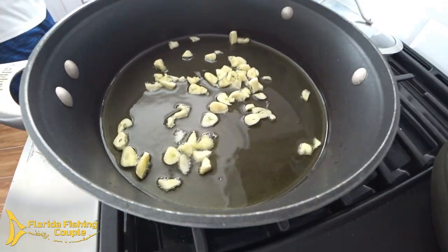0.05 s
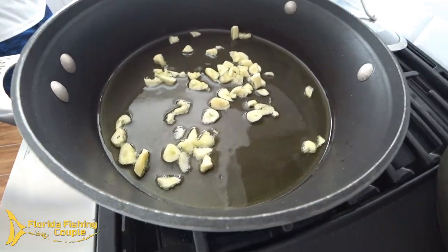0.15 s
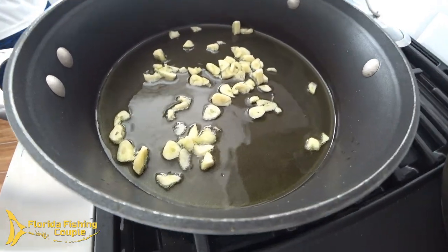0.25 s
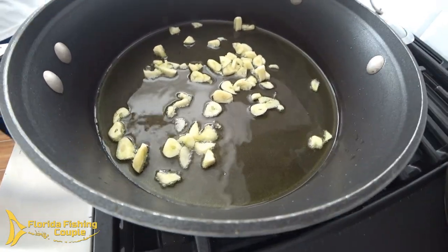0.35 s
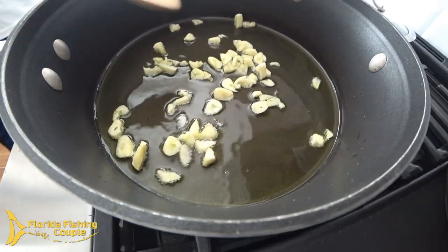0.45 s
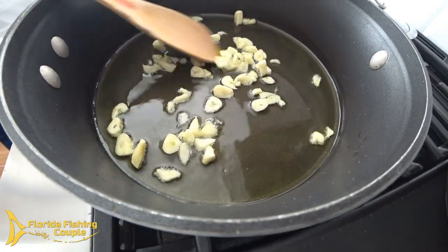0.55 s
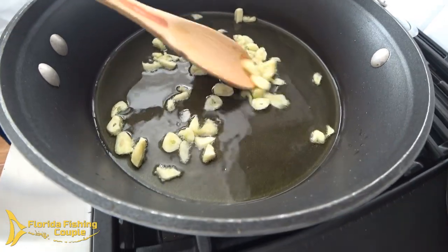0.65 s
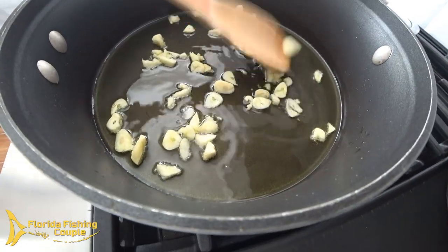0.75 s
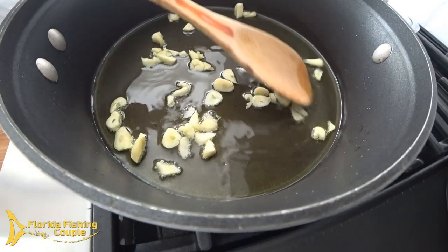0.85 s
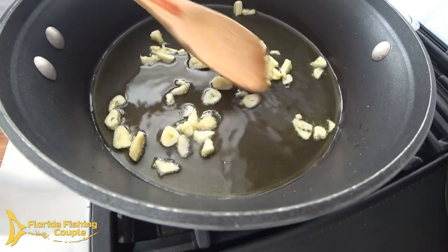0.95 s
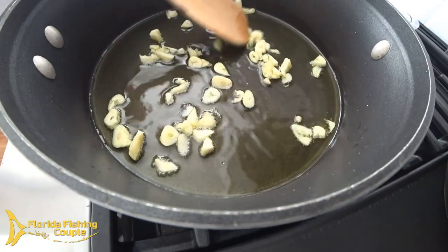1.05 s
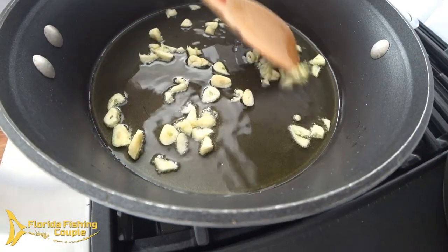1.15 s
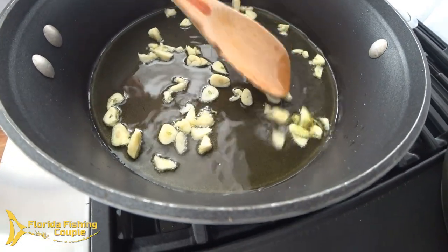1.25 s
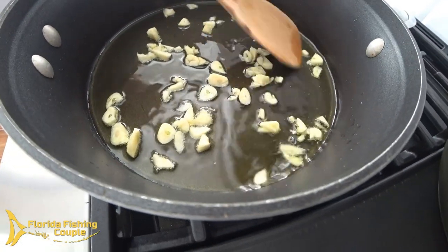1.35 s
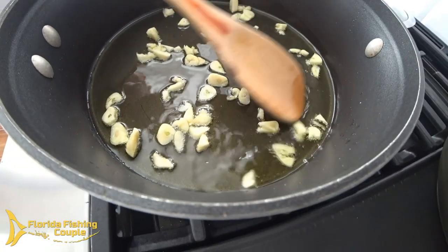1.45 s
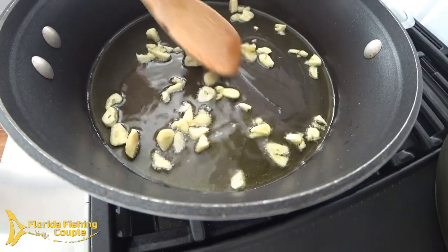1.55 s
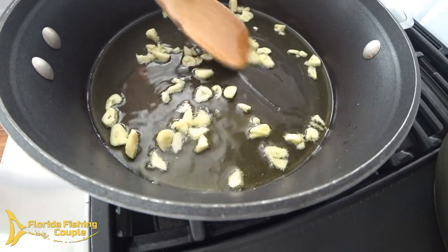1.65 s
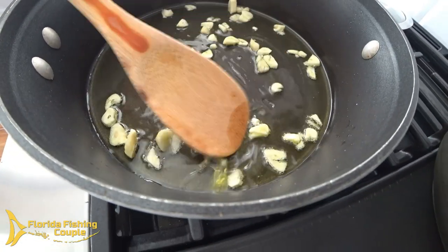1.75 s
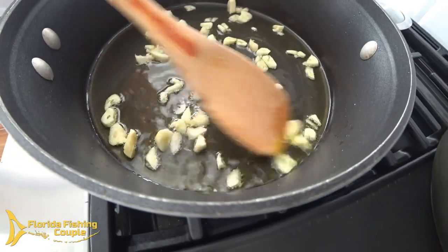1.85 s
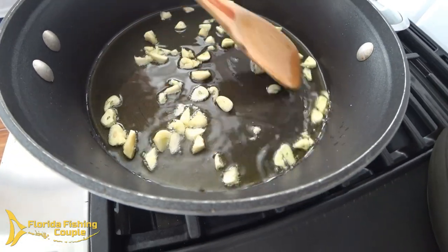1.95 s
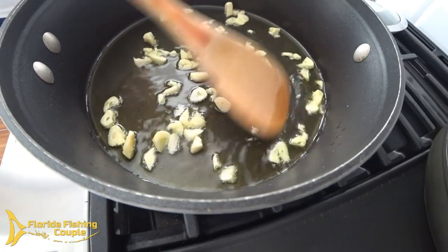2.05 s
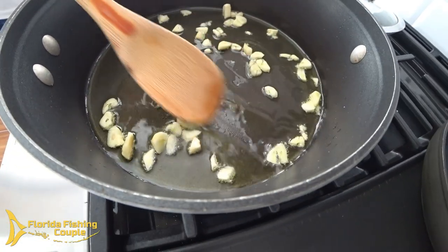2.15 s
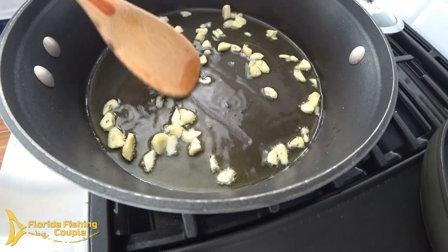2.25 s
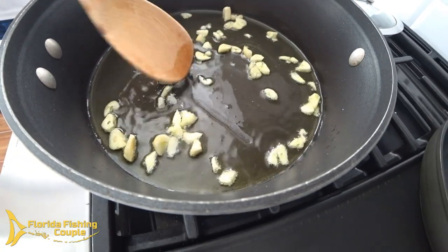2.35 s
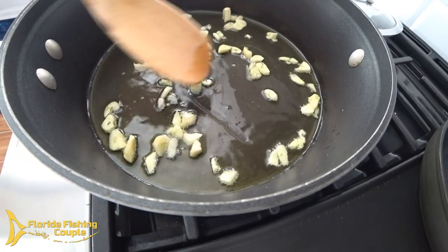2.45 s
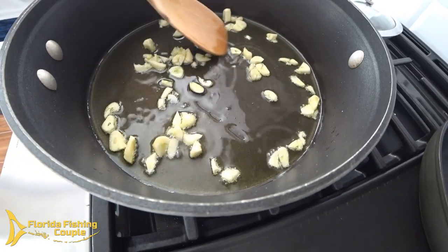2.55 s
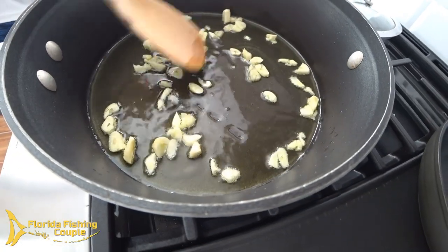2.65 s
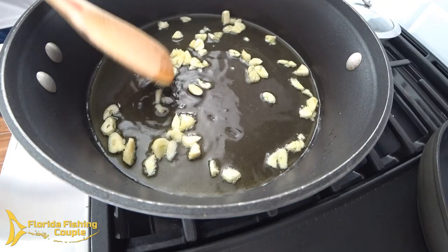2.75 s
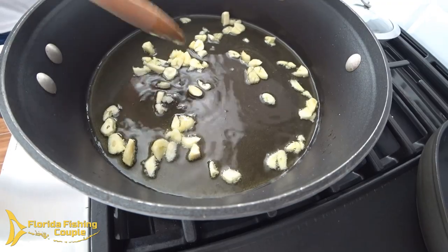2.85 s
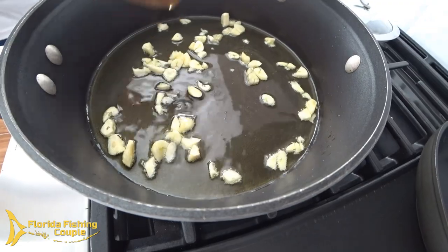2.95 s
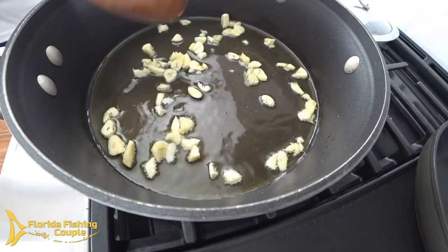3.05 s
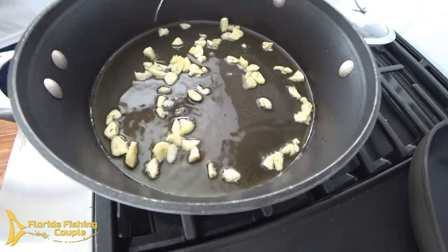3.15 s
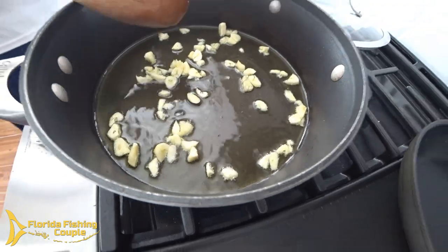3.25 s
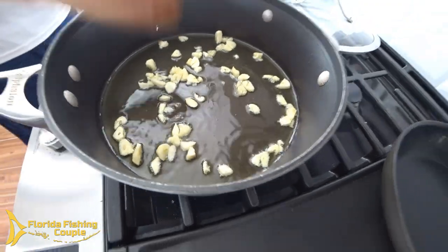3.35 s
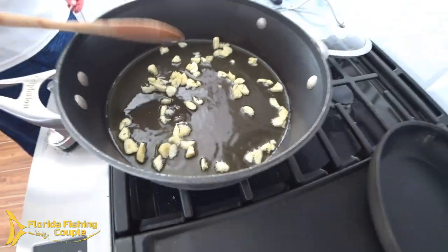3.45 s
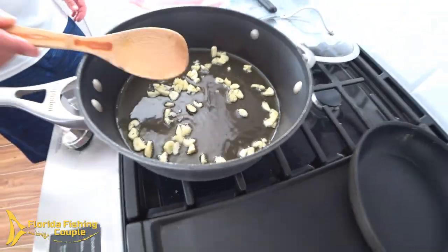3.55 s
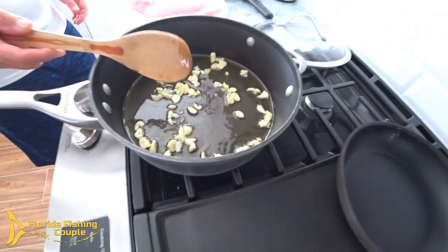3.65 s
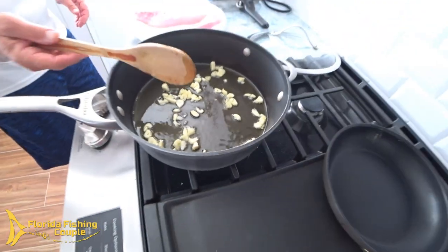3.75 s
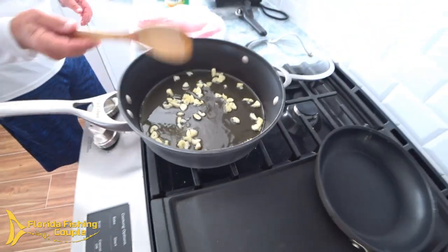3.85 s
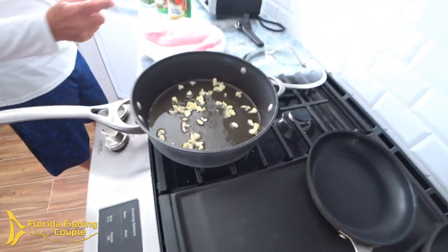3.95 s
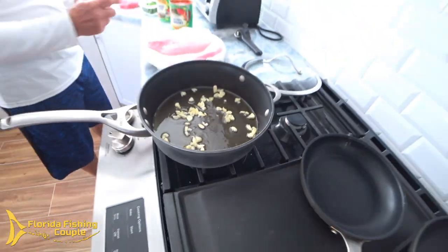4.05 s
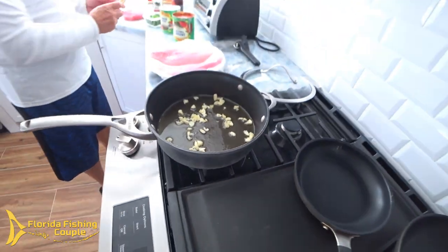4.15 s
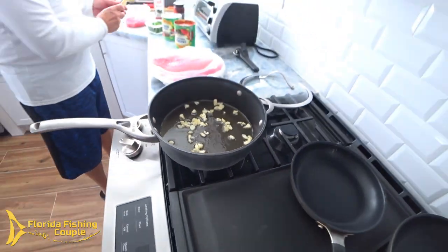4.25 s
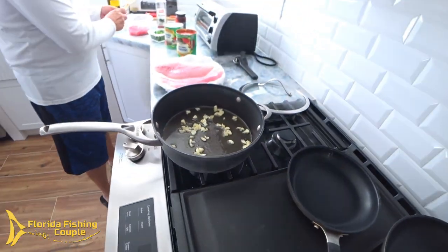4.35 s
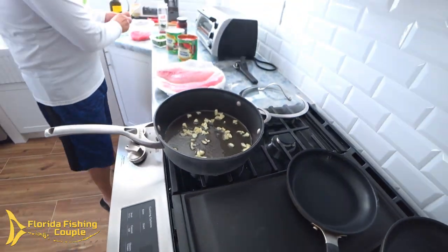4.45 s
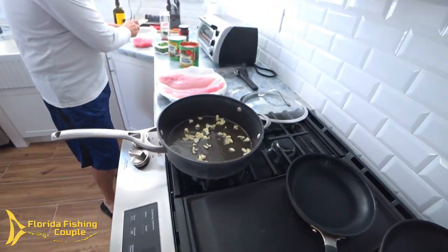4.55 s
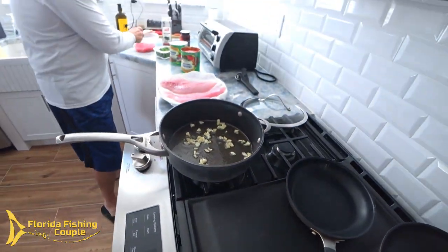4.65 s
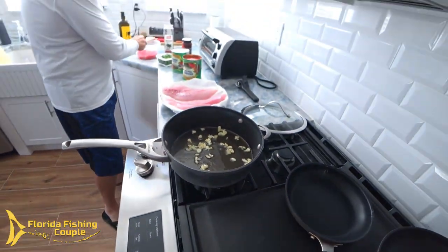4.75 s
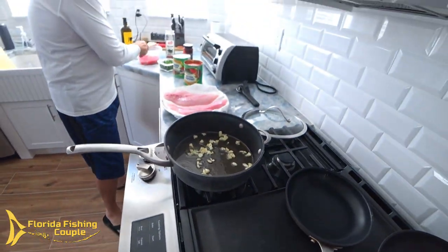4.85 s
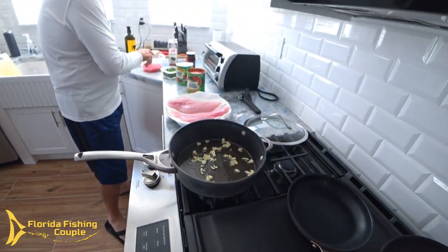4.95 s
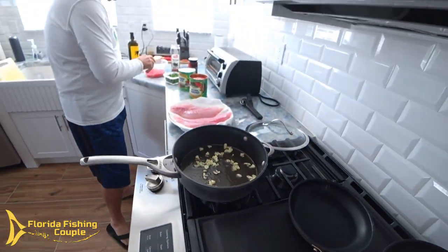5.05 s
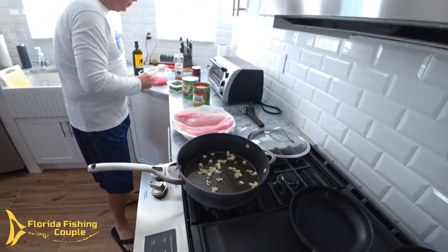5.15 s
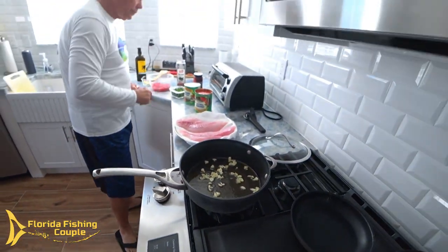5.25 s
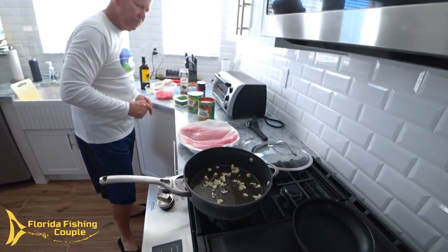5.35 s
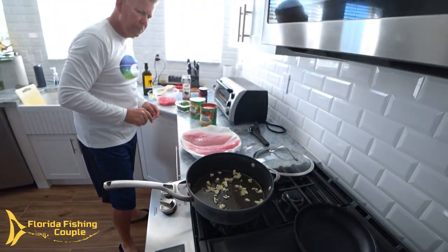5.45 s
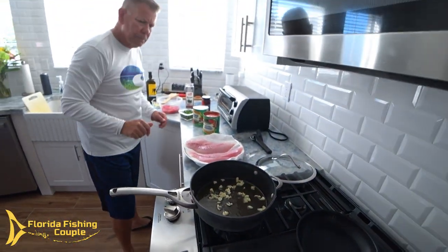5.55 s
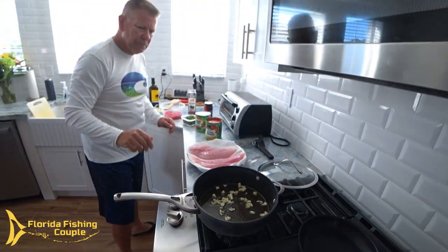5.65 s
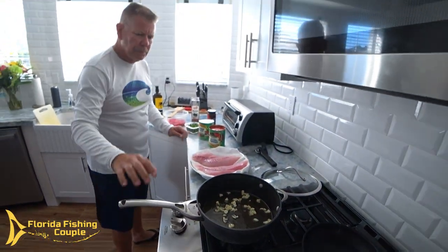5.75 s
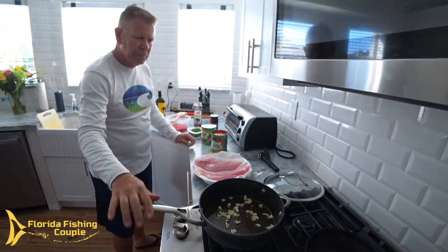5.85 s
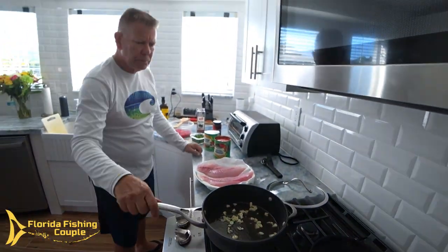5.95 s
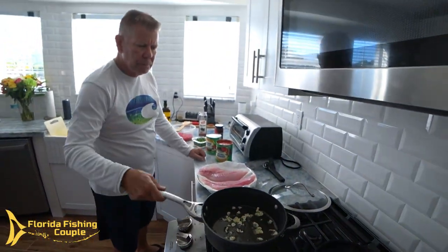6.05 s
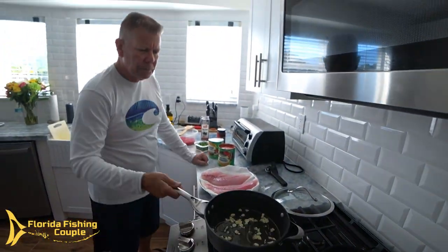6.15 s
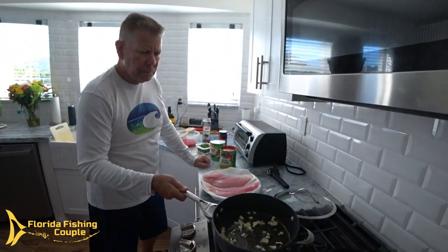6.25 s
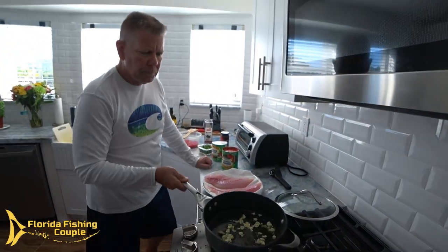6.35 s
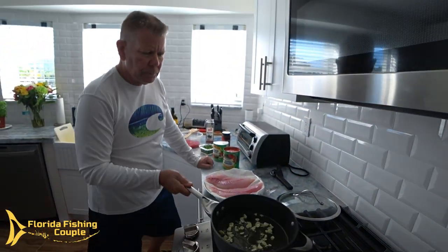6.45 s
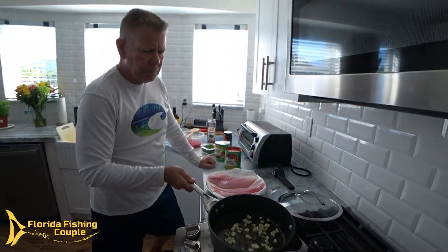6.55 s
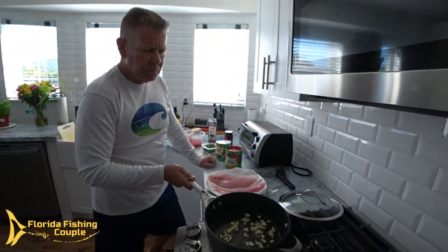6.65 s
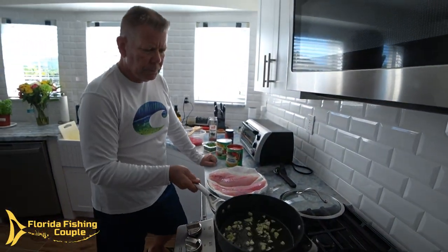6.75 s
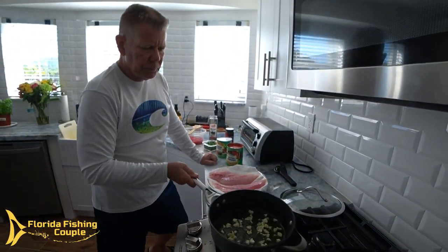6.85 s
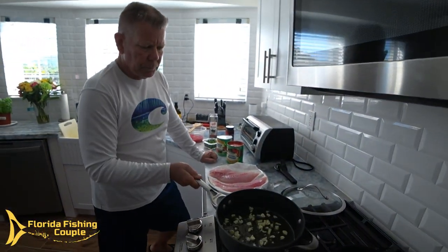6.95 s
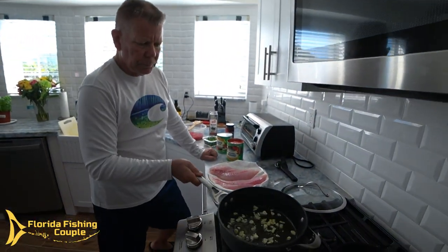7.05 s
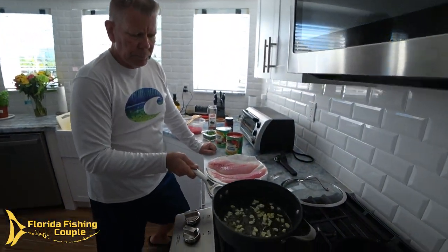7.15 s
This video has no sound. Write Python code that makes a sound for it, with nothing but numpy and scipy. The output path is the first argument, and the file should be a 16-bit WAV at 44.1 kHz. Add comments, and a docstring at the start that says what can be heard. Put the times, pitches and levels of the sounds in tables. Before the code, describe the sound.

A light, grainy frying hiss dotted with crisp, high spits, over faint kitchen air. Wooden spoon knocks and brief gritty strokes excite a deep metal pot; three strong rim raps follow, then one more tap. Frying thins with distance, a dull woody clack marks the spoon being set down, and the pot is jolted and shaken on the stove grate in hollow, rasping bursts. Wide handheld stereo microphones, short bright room reflections.

```python
"""Garlic fizzes and spits in oil in a deep metal pot, as short blurred rings over grainy coloured noise.
Oil splashes once; a wooden spoon taps and scrapes the bottom, raps the rim and is laid on the counter;
then the pot is knocked and shaken to and fro on the iron grate. Noise blows and strokes drive resonances
of the pot, with a dry treble from the contact. A small hard kitchen answers, and two microphone ports of
a hand-held camera hear it all, nearly in opposite phase in the middle of the spectrum."""
import sys
import numpy as np
from scipy import signal
from scipy.fft import rfft, irfft, next_fast_len
from scipy.io import wavfile
from scipy.ndimage import uniform_filter1d, minimum_filter1d, map_coordinates

SR = 44100
rng = np.random.default_rng(int(sys.argv[2]) if len(sys.argv) > 2 else 0)


def generate_wav(sig):
    """Save sig (samples, or channels by samples) to the path in sys.argv[1] as 16-bit PCM at SR."""
    pcm = np.round(np.clip(np.atleast_2d(sig).T, -1, 1) * 32767).astype(np.int16)
    wavfile.write(sys.argv[1], SR, pcm)


N = 317079

# frying and kitchen air, sinking as the camera draws back and swelling at the end: t/s, fizz/dB, air/dB
FRYING_LEVELS = [(0, -56.5, -58.5), (1, -50.5, -56), (2.2, -47, -56), (3, -51, -57.5), (3.8, -55, -58),
                 (4.5, -56.5, -60.5), (5.9, -61, -59.5), (7.19, -49.5, -55)]


def amp(db):
    """Gain of a level in dB."""
    return 10 ** (np.asarray(db) / 20)


def unit(x):
    """Scaled to rms 1."""
    return x / np.sqrt(np.mean(x ** 2) + 1e-20)


def along(points, hz, axis=1):
    """One column of (f/Hz, value, ..) points, read on a log frequency axis."""
    table = np.transpose(points)
    return np.interp(np.log(hz + 1), np.log(table[0] + 1), table[axis])


def curves(rows):
    """One value per sample for each column; the level column is silent outside the rows."""
    s, level, *cols = np.transpose(rows)
    t = np.arange(N) / SR
    return [np.interp(t, s, level, -120, -120)] + [np.interp(t, s, c) for c in cols]


def wobble(rate):
    """A smooth random curve, rate knots a second."""
    knots = rng.standard_normal(int(N * rate / SR) + 4)
    return map_coordinates(knots, [np.arange(N) * rate / SR])


def filtered(x, response):
    """x times a complex response of frequency."""
    m = next_fast_len(N + SR)
    return irfft(rfft(x, m) * response(np.fft.rfftfreq(m, 1 / SR)), m)[..., :N]


def resonances(peaks):
    """Causal response of (f/Hz, width/Hz, level/dB) resonances, with alternating signs."""
    def response(f):
        return sum((-1) ** k * amp(db) * 1j * f * width / (centre ** 2 - f * f + 1j * f * width)
                   for k, (centre, width, db) in enumerate(peaks))
    return response


def high_pass(hz, corner):
    """First-order bass cut."""
    return 1j * hz / corner / (1 + 1j * hz / corner)


def grainy(rate, spread_db, smooth):
    """Random clicks of uneven size, rate a second, mixed by power with a share of smooth noise."""
    clicks = (rng.random(N) < rate / SR) * amp(spread_db * rng.standard_normal(N))
    clicks = clicks * np.sign(rng.standard_normal(N))
    return np.sqrt(smooth) * rng.standard_normal(N) + np.sqrt(1 - smooth) * unit(clicks)


def coloured(x, spectrum):
    """x given a spectrum of (f/Hz, level/dB) points, rms 1."""
    return unit(filtered(x, lambda hz: amp(along(spectrum, hz))))


def patchy(x, depth_db):
    """x with patches of random gain in time and pitch, rms 1."""
    z = signal.stft(x, nperseg=256)[2]
    field = uniform_filter1d(rng.standard_normal(z.shape), size=8, axis=0)
    field = uniform_filter1d(field, size=10, axis=1)
    return unit(signal.istft(z * amp(depth_db * unit(field)), nperseg=256)[1][:N])


def add(track, s, sound):
    """Lay a sound into a track at time s."""
    part = track[round(s * SR):][:len(sound)]
    part += sound[:len(part)]


def pot():
    """Blows and rubbing push the pot's modes; the contact itself adds a dry treble."""
    # ringing modes of the pot: f/Hz, level/dB, t60/s
    modes = [(255, -6.5, 0.19), (453, -13, 0.026), (468.5, -5, 0.057), (627.7, -1, 0.12),
             (677.2, 3.5, 0.099), (698, -4.5, 0.014), (974, -8, 0.096), (1100, -8.5, 0.03),
             (1189, -1.5, 0.2), (1262, 1, 0.067), (1500, -10, 0.012), (1695, -11.5, 0.007),
             (2011, -4.5, 0.024), (2248, -6, 0.041), (2686, -10, 0.017), (3160, -8.5, 0.034),
             (3810, -10.5, 0.12), (5420, -8, 0.023)]
    # a mode's bandwidth follows from its decay
    ring = resonances([(hz, np.log(1000) / np.pi / t60, db) for hz, db, t60 in modes])
    response = ring(np.linspace(0, SR / 2, 1024, endpoint=False))
    blow_push, blow_thump, crack, clatter = struck(response)
    rub_push, rub_thump, rasp = rubbed(response)

    def hollow(hz):
        return ring(hz) * high_pass(hz, 250)  # the pot radiates little bass

    def bright(hz):
        return high_pass(hz, 2600) ** 2 / (1 + 1j * hz / 6000) ** 3

    def dull(hz):
        return resonances([(3600, 4000, 0)])(hz) / (1 + 1j * hz / 7000) ** 3

    grate = resonances([(292, 170, 0.82)])  # the iron grate thumps under the pot
    body = filtered(blow_push + rub_push, hollow)
    contact = rasp + filtered(crack, bright) + filtered(clatter, dull)
    return body + contact + filtered(blow_thump + rub_thump, grate)


def blows():
    """Every blow: t/s, strength/dB, favoured f/Hz, click/dB, rattle/s, thump/dB, reach."""
    # spoon taps on the bottom, and at 0.201 s a splash of oil:
    # t/s, strength/dB, favoured f/Hz, click over the strength/dB
    tap_rows = [(0.201, -27, 1360, 7), (0.596, -10.5, 900, -9), (.819, -27.5, 635, -8),
                (1.416, -32.5, 730, 1), (2.477, -38, 660, -20), (2.584, -14, 755, 0),
                (2.749, -11.5, 710, -8.5), (3.597, -12, 1440, -9.5)]
    # spoon raps on the rim: t/s, strength/dB
    rap_rows = [(3.09, -7.5), (3.254, -4.5), (3.425, -6)]
    # pot knocks on the grate: t/s, strength/dB
    jolt_rows = [(5.931, -38.5), (5.979, -15.5), (6.259, -16), (6.387, -15), (6.517, -11.5), (6.588, -10)]
    rap_hz, rap_click_db, jolt_hz, jolt_click_db = 1130, -10, 1230, -22
    # rattle in s, grate thump over the strength in dB, reach around the favoured pitch as a ratio
    tap, rap, jolt = (0.0028, -17, 1.51), (0.038, -16, 1.73), (0.004, -9.5, 2.7)
    return ([(*row, *tap) for row in tap_rows]
            + [(*row, rap_hz, rap_click_db, *rap) for row in rap_rows]
            + [(*row, jolt_hz, jolt_click_db, *jolt) for row in jolt_rows])


def struck(response):
    """Each blow is a short rattle of noise that feeds modes and grate, with a click and a duller clatter."""
    click_t60_s, click_level_db = .09, 3.5
    clatter_t60_s, clatter_db = 0.077, -8.5  # the clatter outlasts the rattle
    push, thump, crack, clatter = np.zeros((4, N))
    t = np.arange(SR // 5) / SR
    for s, db, hz, click_db, rattle, thump_db, reach in blows():
        steps = rng.standard_normal(len(t) // 128 + 1)
        uneven = amp(3 * np.repeat(steps, 128)[:len(t)])  # many small contacts
        onset = 1 - np.exp(-t / .0007)
        noise = rng.standard_normal((3, len(t))) * uneven * onset
        settle = 1 / (1 + (t / rattle) ** 6)  # the contact chatters, then settles
        settle_rms = np.sqrt(np.mean(settle ** 2))
        body, click = [unit(row * settle) * settle_rms for row in noise[:2]]
        short_boost = np.sqrt(1 + 0.013 / rattle)  # shorter blows push harder
        add(push, s, amp(db - 12.0) * short_boost * favouring(body, hz, reach, response))
        add(thump, s, amp(db + thump_db) * body)
        add(crack, s, amp(db + click_db + click_level_db) * click * amp(-60 * t / click_t60_s))
        fade = amp(-60 * np.maximum(t - rattle, 0) / clatter_t60_s)
        add(clatter, s, amp(db + click_db + clatter_db) * noise[2] * np.sqrt(rattle / .01) * fade)
    return push, thump, crack, clatter


def rubbed(response):
    """Spoon scrapes and pot slides push the modes with stick-slip noise and rasp in the treble."""
    # scrapes of the spoon on the bottom: centre t/s, level/dB, favoured f/Hz
    stir_rows = [(1.13, -52, 1250), (1.21, -56, 1680), (1.452, -47, 1020), (1.51, -48, 1010),
                 (1.568, -37.5, 1070), (1.629, -44, 700), (1.702, -39, 726), (1.75, -34, 1630),
                 (1.93, -44, 1930), (1.988, -44, 1790), (2.098, -35.5, 1470), (2.213, -36.5, 1120),
                 (2.29, -46.5, 835)]
    # slides of the pot on the grate: centre t/s, level/dB, half length/s
    shake_rows = [(6.002, -36, 0.18), (6.133, -36, 0.016), (6.271, -24.5, 0.031), (6.41, -21.5, 0.048),
                  (6.523, -30, 0.041), (6.634, -29, 0.069), (6.784, -35.5, 0.046), (6.91, -36, 0.055),
                  (7.018, -31.5, 0.033), (7.109, -38, 0.052), (7.185, -42.5, 0.056)]
    # rubbing treble: f/Hz, level/dB per Hz
    grit = [(1500, -21.5), (2500, 6), (4000, 2.5), (5500, -1), (7000, 2.5), (10000, -10), (15500, -35)]
    stir_half_s, stir_rasp_db, rasp_db_per_octave = 0.029, -11, 9  # rasp over the level at 1 kHz
    shake_hz, shake_rasp_db = 1040, -7.5  # favoured pitch, rasp over the level
    loose_s = 5.979  # the pot breaks loose from the grate
    scrapes = []
    for s, db, hz in stir_rows:
        rasp_db = db + stir_rasp_db + rasp_db_per_octave * np.log2(hz / 1000)  # higher scrapes rasp more
        scrapes.append((s, db, stir_half_s, hz, rasp_db))
    slides = [(s, db, half, shake_hz, db + shake_rasp_db) for s, db, half in shake_rows]
    stir, stir_rasp = strokes(scrapes, response, spread=1.4, lead=.002)
    shake, shake_rasp = strokes(slides, response, spread=4.36, lead=0.012)
    loose = np.arange(N) >= loose_s * SR
    shake, shake_rasp = shake * loose, shake_rasp * loose
    thump = shake_rasp * rng.standard_normal(N)
    slip = amp(2.5 * wobble(60) + 1.5 * wobble(22))  # the contact sticks and slips
    push = amp(-1.5) * slip * (stir + shake)
    treble = patchy(coloured(grainy(rate=1200, spread_db=5, smooth=0.6), grit), depth_db=2.5)
    return push, thump, slip * (stir_rasp + shake_rasp) * treble


def strokes(table, response, spread, lead):
    """Each stroke of rough noise swells and fades; its rasp envelope starts lead seconds earlier."""
    push, rasp, t = np.zeros(N), np.zeros(N), np.arange(-SR // 4, SR // 4) / SR
    rough = grainy(rate=1500, spread_db=2, smooth=0.54)
    for s, db, half, hz, rasp_db in table:
        swell = 1 / (1 + (t / half) ** 2) ** 1.76
        part = rough[round((s + t[0]) * SR):][:len(t)]
        add(push, s + t[0], amp(db) * favouring(part * swell[:len(part)], hz, spread, response))
        add(rasp, s + t[0] - lead, amp(rasp_db) * swell)
    return push, rasp


def favouring(x, hz, spread, response):
    """A push that drives the modes around hz, scaled to sound through them at its own level."""
    sos = signal.butter(2, [hz / spread, hz * spread], "band", fs=SR, output="sos")
    band = np.abs(signal.sosfreqz(sos, len(response))[1])
    y = unit(signal.sosfilt(sos, x)) * np.sqrt(np.mean(x ** 2))
    return y * np.sqrt(np.mean(band ** 2) / np.mean(np.abs(band * response) ** 2))


def spoon_down():
    """The spoon lands on the counter: a short noise burst drives broad wooden resonances."""
    # the landing: t/s, strength/dB
    landing = [(4.705, -17.5)]
    # resonances of spoon and counter: f/Hz, width/Hz, level/dB
    wood_modes = [(668, 156, 10.5), (872, 326, 7.5), (1140, 270, 4.5), (1490, 210, 5.5), (5600, 3000, -14)]
    push, t = np.zeros(N), np.arange(SR // 10) / SR
    for s, db in landing:
        add(push, s, amp(db) * unit(amp(-60 * t / 0.032) * rng.standard_normal(len(t))))
    wood = resonances(wood_modes)
    return filtered(push, lambda hz: wood(hz) * high_pass(hz, 280) / (1 + 1j * hz / 2500))


def frying():
    """Countless tiny bubbles fizz, larger ones spit or whistle, over the quiet air of the kitchen."""
    fizz_db, air_db = curves(FRYING_LEVELS)
    spits = spitting(fizz_db)
    return fizzing(fizz_db) + air(air_db) + spits + amp(-9.5) * kitchen(spits) + whistling()


def fizzing(fizz_db):
    """Countless tiny bubbles: grainy noise with an unsteady level and a patchy spectrum."""
    # fizz spectrum: f/Hz, level/dB per Hz
    fizz_spectrum = [(1500, -18.5), (2800, -2.5), (5000, 1), (7500, 0), (10000, -1.5), (16000, -10)]
    unsteady_db = .8 * wobble(3) + 1.1 * wobble(12)
    grains = coloured(grainy(rate=250, spread_db=4, smooth=0.75), fizz_spectrum)
    return amp(fizz_db + unsteady_db) * patchy(grains, depth_db=2)


def spitting(fizz_db):
    """Larger bubbles burst with a noisy snap and a short blurred ring at their own pitch."""
    # the prominent spits: t/s, ring level/dB, f/Hz
    spit_rows = [(0.26, -33.5, 6700), (0.456, -38, 5330), (0.4773, -29.5, 5330), (0.6279, -32, 4800),
                 (1.2661, -28, 4630), (1.3426, -36, 10050), (1.719, -29.5, 7400), (2.2787, -31.5, 11400),
                 (2.2965, -30.5, 5180), (2.39, -40, 8750), (2.484, -33, 7240), (2.534, -27.5, 7500),
                 (2.559, -25, 6960), (2.6572, -26.5, 7230), (2.715, -25.5, 9900), (2.799, -30, 7000),
                 (2.808, -25.5, 8230), (2.88, -32.5, 9800), (3.02, -30, 7800), (3.3652, -32, 5750),
                 (3.3861, -29, 6470), (3.7674, -30, 6610), (4.005, -38, 11300), (4.626, -36, 5500),
                 (4.794, -36, 6550), (4.816, -35.5, 7040), (5.0759, -33.5, 5730), (5.273, -37, 5350),
                 (5.4779, -38, 5350), (5.495, -38, 7840), (5.7285, -38, 6440), (5.841, -40, 8040)]
    ring_t60_s, snap_t60_s, snap_share = .015, 0.0011, .45  # snap over ring
    blur = 0.26  # phase noise in radians a sample
    # small spits: rate, mean level over the fizz, pitch and its scatter
    small_per_s, small_db, small_hz, small_octaves = 10, 11, 7000, .4
    count = int(small_per_s * N / SR)
    small = []
    for s in rng.random(count) * N / SR:
        level_chance, pitch_chance = rng.standard_normal(2)
        db = fizz_db[int(s * SR)] + small_db + 3 * level_chance
        small.append((s, db, small_hz * 2 ** (small_octaves * pitch_chance)))
    track, t = np.zeros(N), np.arange(SR // 10) / SR
    for s, db, hz in [*spit_rows, *small]:
        chance = rng.standard_normal((2, len(t)))
        ring = np.sin(2 * np.pi * hz * t + blur * np.cumsum(chance[0])) * amp(-60 * t / ring_t60_s)
        snap = snap_share * np.diff(chance[1], prepend=0) * amp(-60 * t / snap_t60_s)
        add(track, s, amp(db) * (ring + snap))
    return track


def whistling():
    """A bubble stream whistles downward as the spoon pushes the cloves: a sine blurred by phase noise."""
    # the whistle's glide: t/s, level/dB, f/Hz
    glide = [(1.1, -56, 7380), (1.19, -39.5, 6840), (1.3, -49, 4900)]
    level_db, hz = curves(glide)
    hz = hz * 2 ** (.12 * wobble(70))  # each bubble has its own size
    phase = np.cumsum(2 * np.pi * hz / SR + .4 * rng.standard_normal(N))
    return amp(level_db + 1.9 * wobble(120)) * np.sin(phase)


def air(air_db):
    """The kitchen's air: steady low noise that follows its own level curve."""
    # air spectrum: f/Hz, level/dB per Hz
    air_spectrum = [(25, -22), (70, -8), (200, -10), (700, -2.5), (1300, -2.5), (2000, -3.5), (4000, -13),
                    (8000, -76)]
    return amp(air_db) * coloured(rng.standard_normal(N), air_spectrum)


def kitchen(x):
    """The room answers with a noise tail in which each frequency dies at its own speed."""
    # reverberation: f/Hz, t60/s
    decay = [(200, 0.69), (1000, 0.42), (4000, 0.48), (12000, 0.25)]
    hz, t, z = signal.stft(rng.standard_normal(SR), SR, nperseg=256)
    tail = signal.istft(z * amp(-60 * t / along(decay, hz)[:, None]), SR, nperseg=256)[1]
    delayed = np.pad(x, (200, 0))
    return signal.fftconvolve(delayed, tail / np.linalg.norm(tail))[:N]


def scene():
    """Everything reaches both ports; a scattered part differs between them, most in treble and deep bass."""
    # unshared part of each port: f/Hz, level/dB
    apart = [(30, -3), (150, -12), (500, -22), (2000, -16), (8000, -5), (15000, -1)]
    vessel, spoon = pot(), spoon_down()
    near = vessel + spoon + frying() + kitchen(amp(-9) * vessel + amp(-6) * spoon)
    hz, _, z = signal.stft(near, SR, nperseg=256)
    turns = np.exp(2j * np.pi * rng.random((2, *z.shape)))  # random phases for each port
    scattered = signal.istft(z * turns * amp(along(apart, hz))[:, None], SR, nperseg=256)[1]
    return near + scattered[:, :N]


def record(dry):
    """Ports turn the phase against each other, keeping the sum flat; bass cut, peak limiter and top cut."""
    # the two ports: f/Hz, lead of the left port/rad, left over right/dB
    port_rows = [(60, .6, -1), (130, 1.4, -3.5), (260, 2, -2.5), (950, 2.6, -1.2), (4200, 2, -1.6),
                 (8700, 1.1, -3.2), (15600, .4, -3.8)]
    ceiling, top_hz = .8, 15900

    def ports(hz):
        half = amp(along(port_rows, hz, axis=2) / 2) * np.exp(1j * along(port_rows, hz) / 2)
        pair = np.array([half, 1 / half]) / np.abs(half + 1 / half) * 2
        return pair * high_pass(hz, 60) ** 2

    heard = filtered(dry, ports)
    needed = np.minimum(1, ceiling / (np.abs(heard).max(axis=0) + 1e-9))
    gain = uniform_filter1d(minimum_filter1d(needed, size=401), size=201)
    return filtered(heard * gain, lambda hz: hz < top_hz)


dry = scene()
out = record(dry)
generate_wav(out)
```